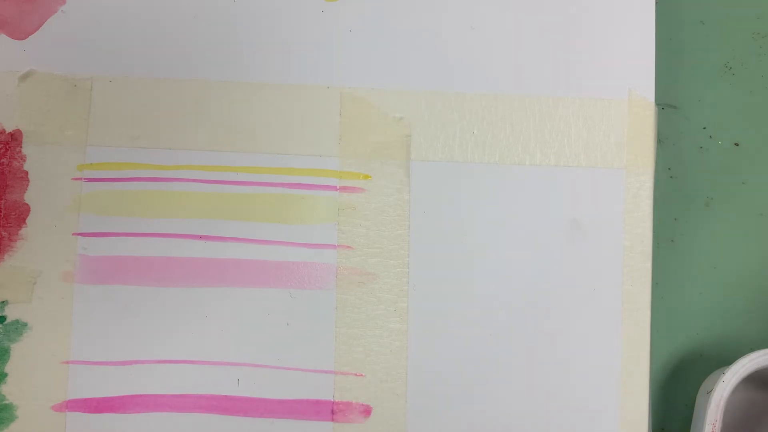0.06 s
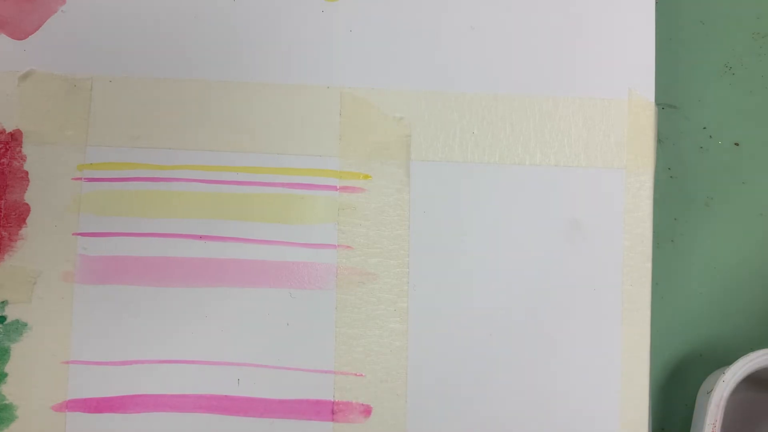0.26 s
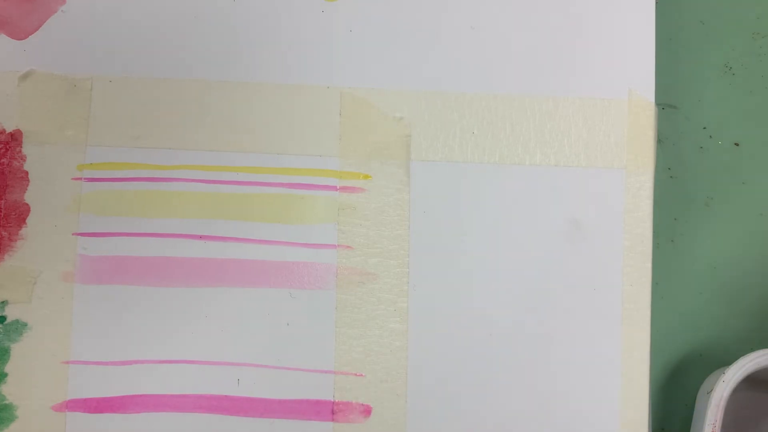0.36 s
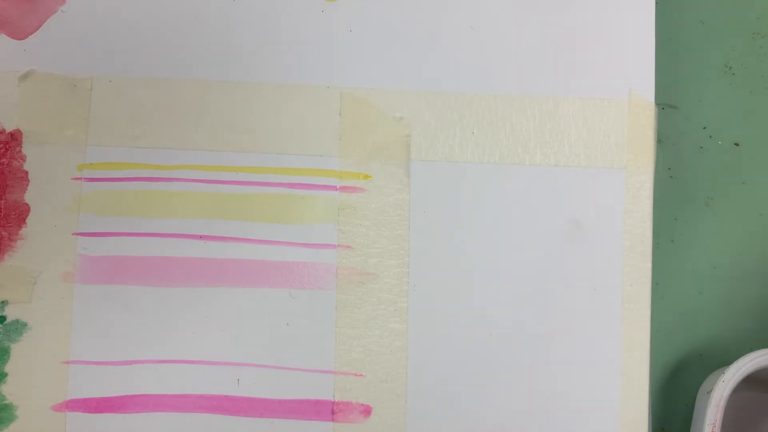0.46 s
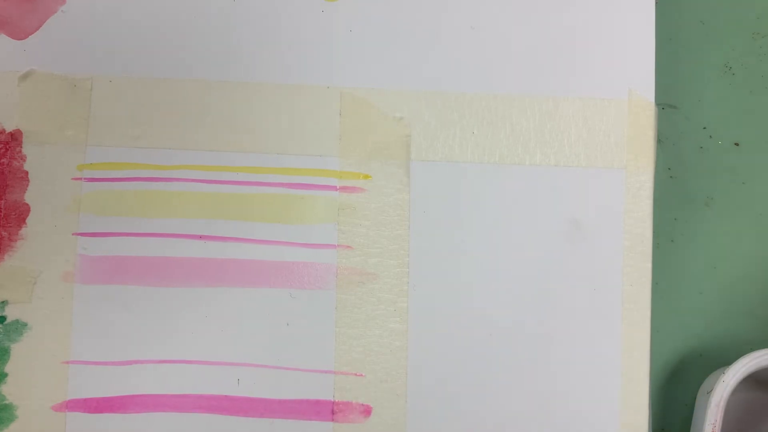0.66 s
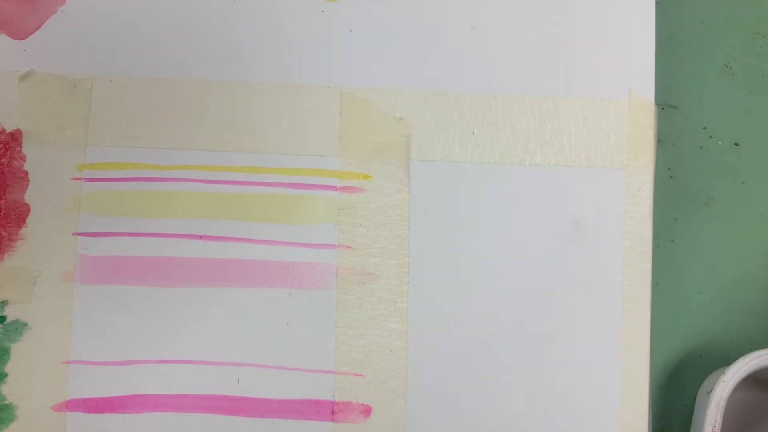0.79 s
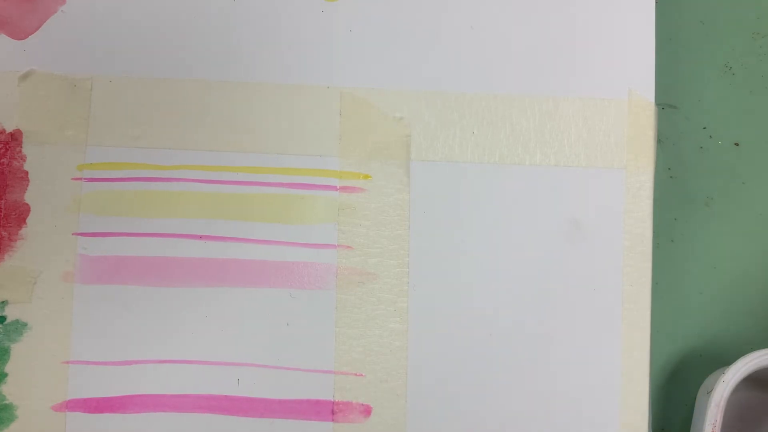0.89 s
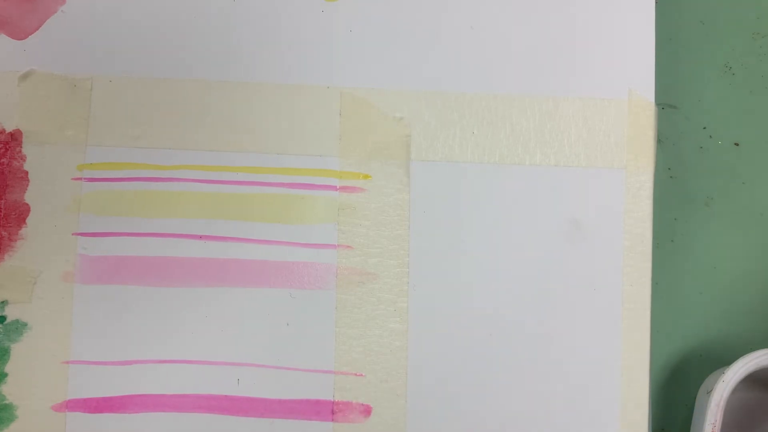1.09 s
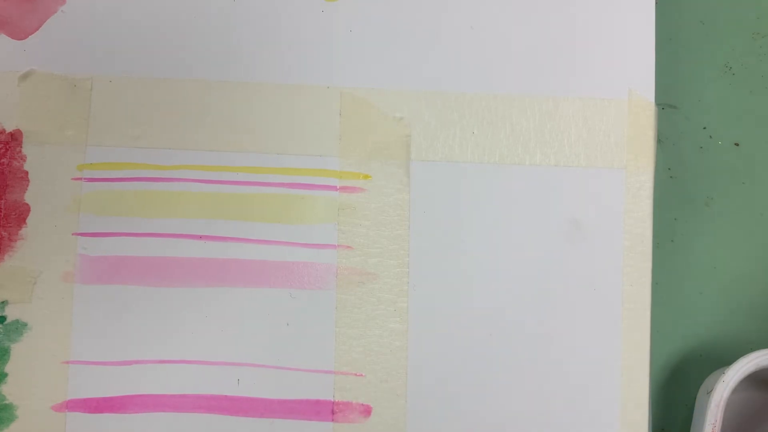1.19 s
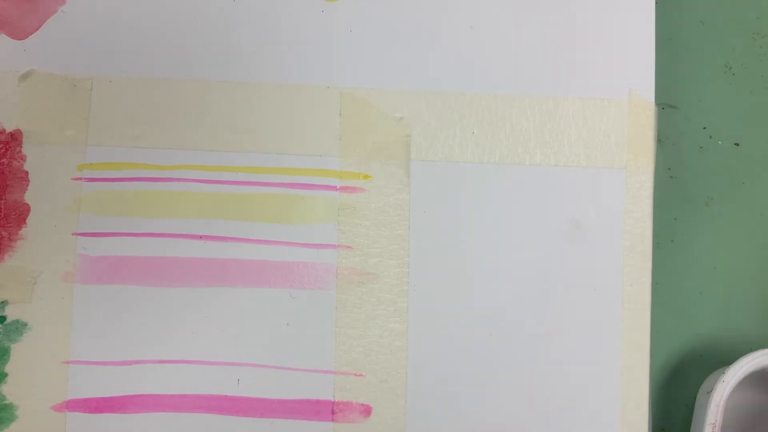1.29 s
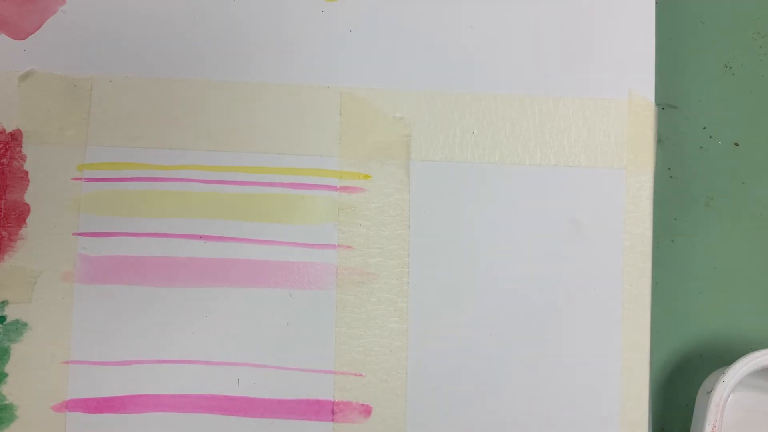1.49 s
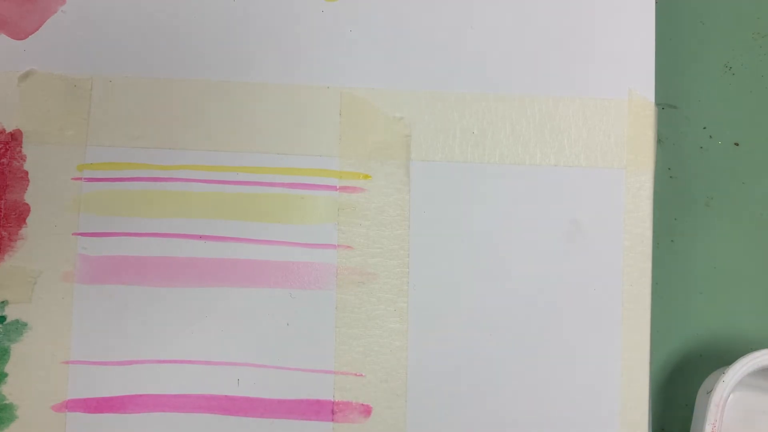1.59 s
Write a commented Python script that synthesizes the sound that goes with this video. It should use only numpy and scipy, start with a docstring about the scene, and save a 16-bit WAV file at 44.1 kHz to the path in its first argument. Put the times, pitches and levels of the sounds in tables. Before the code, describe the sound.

A paintbrush knocks rapidly and unevenly in a plastic cup of water, light taps first, then hard dry clacks mixed with ringing taps, faint glugs and swishing, ending on one bright tap; close stereo microphones, quiet room.

```python
"""A paintbrush rattles in a plastic cup of water, close by in a quiet room.
It strikes both walls in an uneven order: hard damped clacks on one, lighter taps on the other that ring on.
Each blow is a burst of noise plus fading tones; a tap also scrapes along the wall.
The water gives a few low glugs and one bright plip, made of gliding tones, and hisses as it is stirred.
The table top adds quick reflections; the room adds a short tail and a low rumble."""
import sys
import numpy as np
from scipy import signal
from scipy.fft import rfft, irfft
from scipy.io import wavfile

SR = 44100
rng = np.random.default_rng(int(sys.argv[2]) if len(sys.argv) > 2 else 0)


def log_audio(samples):
    """Write samples as a 16-bit WAV file to the path given in sys.argv[1]."""
    # one column per channel
    frames = np.atleast_2d(samples).T
    # limit to full scale, then quantise
    limited = np.clip(frames, -1, 1)
    pcm = np.round(limited * 32767).astype(np.int16)
    wavfile.write(sys.argv[1], SR, pcm)


N = 72765  # length in samples


def amp(db):
    """Turns decibels into a gain."""
    return 10 ** (np.asarray(db) / 20)


def read(points, hz):
    """Reads a table of (f/Hz, value) between its points, on a log-frequency axis."""
    f, value = np.transpose(points)
    return np.interp(np.log(hz + 1), np.log(f + 1), value)


def level_over_time(points):
    """Turns a table of (t/s, level/dB) into a gain for every sample."""
    return amp(np.interp(np.arange(N) / SR, *np.transpose(points)))


def unit(x):
    """Scales a sound to energy one."""
    return x / np.sqrt(np.sum(x ** 2) + 1e-20)


def add(mix, s, sound):
    """Mixes a sound in, starting at s seconds."""
    part = mix[max(round(s * SR), 0):][:len(sound)]
    part += sound[:len(part)]


def bins():
    """Frequencies in Hz of a spectrum padded to twice the length."""
    return np.fft.rfftfreq(2 * N, 1 / SR)


def coloured(x, db, size=4096):
    """Filters x with a gain in dB that depends on frequency, never sounding ahead of its input."""
    log_gain = np.log(amp(db(abs(np.fft.fftfreq(size, 1 / SR)))))
    minimum_phase = np.exp(np.conj(signal.hilbert(log_gain)))
    taps = np.fft.ifft(minimum_phase).real
    return signal.fftconvolve(x, taps[:size // 2])[:len(x)]


def dying(t, t60):
    """Exponential fade that drops 60 dB in t60 seconds."""
    return np.exp(-np.log(1000) * t / t60)


def partly_alike(a, b, same):
    """Pairs a with a blend of a and b; same = 1 gives twins, 0 gives strangers."""
    same = np.clip(same, -1, 1)
    return np.array([a, same * a + np.sqrt(1 - same ** 2) * b])


def noise(spectrum, same):
    """Two channels of noise, overall rms one, with a given colour and left-right likeness."""
    a, b = rfft(rng.standard_normal((2, 2 * N)))
    x = irfft(partly_alike(a, b, same) * amp(read(spectrum, bins())))[:, :N]
    return x / x.std()


# colour of the room rumble (f/Hz, relative level/dB per Hz)
RUMBLE_COLOUR = [(15, -63), (25, -34.5), (38, -14.5), (50, 0.5), (72, -12.5), (108, 3), (165, -8),
                 (280, -9), (439, -17), (540, -23), (780, -16), (1050, -18), (1500, -25.5), (2100, -28.5),
                 (3000, -32.5), (4600, -42.5), (7500, -52.5), (10000, -50), (14000, -49), (17000, -69)]
# slow swell of the rumble (t/s, change of level/dB)
RUMBLE_SWELL = [(0, -0.5), (.3, 1), (.8, -1), (1.2, -0.5), (1.65, -0.5)]
# how alike left and right are, in the rumble and in the room tail (f/Hz, likeness 0 to 1)
LIKENESS = [(60, 1), (130, 0.94), (290, 0.9), (640, 0), (1400, 0.4), (6000, 0.014)]
RUMBLE_DB = -53


def rumble():
    """Low room rumble: steady noise, nearly the same in both channels in the bass."""
    return noise(RUMBLE_COLOUR, read(LIKENESS, bins())) * amp(RUMBLE_DB) * level_over_time(RUMBLE_SWELL)


# colour of the stirred water's hiss (f/Hz, relative level/dB per Hz)
SWISH_COLOUR = [(200, -40), (500, -24), (1000, 7), (1800, 3), (3000, 3), (6000, -3.5), (9000, -24.5),
                (13000, -14), (16000, -28.5)]
# loudness of that hiss (t/s, level/dB)
SWISH_LEVEL = [(0, -92), (.25, -65), (.6, -65.5), (.8, -75.5), (1.0, -61.5), (1.2, -65.5), (1.45, -78),
               (1.65, -101)]


def swish():
    """The hiss of the swirling water: noise that comes and goes."""
    return noise(SWISH_COLOUR, 0) * level_over_time(SWISH_LEVEL)


# colour of the water parting round the bristles (f/Hz, relative level/dB per Hz)
STIR_COLOUR = [(600, -23), (1100, -12), (1550, 1.5), (1950, 2), (2500, -14), (5000, -34.5)]
# loudness of the parting water (t/s, level/dB)
STIR_LEVEL = [(0, -70), (.15, -65), (.3, -63), (.45, -77.5), (1.65, -82)]


def stir():
    """The first strokes through the water: a narrower noise, strongest early on."""
    return noise(STIR_COLOUR, 0) * level_over_time(STIR_LEVEL)


# how long the room tail takes to fade by 60 dB (f/Hz, t60/s)
ROOM_T60 = [(100, 0.18), (400, 0.19), (2000, 0.11), (6000, 0.18), (13000, 0.12), (17000, 0.073)]


def room(x):
    """A short diffuse tail, each band dying at its own speed; its bass is alike in both channels."""
    hz, t, (a, b) = signal.stft(rng.standard_normal((2, SR // 2)), SR, nperseg=256)
    bands = partly_alike(a, b, read(LIKENESS, hz)[:, None])
    tail = signal.istft(bands * dying(t, read(ROOM_T60, hz)[:, None]), SR)[1]
    fade_in = np.minimum(np.arange(tail.shape[1]) / SR / 0.0013, 1)  # over 1.3 ms
    tail = tail * fade_in
    return signal.fftconvolve(x[None], tail / np.linalg.norm(tail[0]), axes=1)[:, :N]


TABLE_DB, TABLE_T60_S = -2.5, 0.015


def table(x):
    """Quick scattered reflections from the table top in the midrange, different at each microphone."""
    t = np.arange(SR // 50) / SR
    taps = np.array([unit(row * dying(t, TABLE_T60_S)) for row in rng.standard_normal((2, len(t)))])
    midrange = signal.butter(2, [500, 5500], "bandpass", fs=SR, output="sos")
    mids = signal.sosfilt(midrange, x)
    return amp(TABLE_DB) * signal.fftconvolve(mids[None], taps, axes=1)[:, :N]


# air pockets in the water (t/s, starting f/Hz, level/dB, rise/s, t60/s, glide/octaves per s)
AIR_POCKETS = [(0.33, 1830, -34.5, 0.00056, 0.042, 5.5), (0.3366, 1870, -16, 0.0011, 0.013, 2.5),
               (0.339, 1743, -39, .002, 0.052, 2), (0.341, 322, -36, 0.002, 0.047, -3),
               (.374, 289, -34.5, 0.0026, 0.039, 0), (0.375, 116, -37, 0.0029, 0.078, 0),
               (0.9253, 260, -38.5, 0.0053, 0.055, -9), (0.9676, 520, -25, 0.0033, 0.031, 2),
               (.9690, 345, -24.5, .003, 0.045, 4.5), (.9700, 210, -19.5, 0.0052, 0.047, 1),
               (.978, 121, -27, 0.0073, 0.076, 2), (1.075, 117, -38, 0.012, 0.082, 1.5),
               (1.1235, 430, -41, 0.0018, 0.015, -3), (1.1240, 250, -19.5, 0.0055, 0.044, -8),
               (1.13, 150, -34.5, .006, .08, -1)]
SPLASH_DB, SPLASH_WIDTH_HZ = -11.5, 150  # level against the tone, half-width around its pitch


def water():
    """Each air pocket swells and dies as one gliding tone, with a little splash around its pitch."""
    out, t = np.zeros(N), np.arange(SR // 5) / SR
    f = np.fft.rfftfreq(len(t), 1 / SR)
    for s, hz, db, rise, t60, glide in AIR_POCKETS:
        gliding_hz = hz * 2 ** (glide * t)
        tone = np.sin(2 * np.pi * np.cumsum(gliding_hz) / SR)
        band = f / (f + hz) / (1 + ((f - hz) / SPLASH_WIDTH_HZ) ** 2)
        splash = irfft(rfft(rng.standard_normal(len(t))) * band, len(t))
        splash = unit(splash) * np.sqrt(len(t))  # rms one
        envelope = np.minimum(t / rise, 1) * dying(t, t60)
        add(out, s, amp(db) * envelope * (tone + amp(SPLASH_DB) * splash))
    return out


# colour of brush against plastic, for the scrape and the tick (f/Hz, level/dB)
CONTACT_COLOUR = [(100, -10.5), (450, -15), (1000, -11), (1700, -13.5), (2350, -27), (3100, -5.5),
                  (3800, -1.5), (4500, 2.5), (5600, -4), (6800, -0.5), (8300, -4), (11000, 1), (12600, 3.5),
                  (14300, 3.5), (15700, -2.5), (16800, -9)]
SCRAPE_DB, SCRAPE_T60_S, SCRAPE_PER_S = -8.5, 0.055, 2300  # level against the tick, fade, slips per second


def scrape(t):
    """The handle slides on along the wall in tiny uneven slips: random clicks that fade."""
    slips = (rng.random(len(t)) < SCRAPE_PER_S / SR) * rng.standard_normal(len(t))
    fading = unit(slips * dying(t, SCRAPE_T60_S))
    return amp(SCRAPE_DB) * coloured(fading, lambda hz: read(CONTACT_COLOUR, hz))


SNAP_DB, SNAP_T60_S = 11, 0.001  # noise of the snap against its single click
SHIVER_DB, SHIVER_T60_S = -1, 0.0085  # level against the snap
ALIKE = 0.53  # how much of the noise grain all blows share, 0 to 1


def octaves(hz):
    """Octaves from 7000 Hz, the middle of the cup's ring, limited to -2 and 1."""
    return np.clip(np.log2((hz + 1) / 7000), -2, 1)


def tick(t, shell, tilt_db):
    """The contact: a sharp snap, then the dense, quickly damped shiver of the plastic."""
    grain = ALIKE * shell + np.sqrt(1 - ALIKE ** 2) * rng.standard_normal(len(t))
    click = t == 0
    burst = unit(grain * dying(t, SNAP_T60_S) * (t > 0))
    snap = unit(click + amp(SNAP_DB) * burst)
    # the shiver comes up as the snap dies away
    shiver = unit(grain[::-1] * dying(t, SHIVER_T60_S) * (1 - dying(t, SNAP_T60_S)))
    contact = unit(snap + amp(SHIVER_DB) * shiver)
    return coloured(contact, lambda hz: read(CONTACT_COLOUR, hz) + tilt_db * octaves(hz))


# ringing tones (modes) of cup and brush (f/Hz, t60/s when free, level/dB in a clack, level/dB in a tap)
MODES = [(3183, 0.049, -59, -44.5), (4600, 0.067, -53, -42), (4856, 0.0096, -26, -42.5),
         (5250, 0.054, -51, -43.5), (5590, 0.088, -40.5, -77), (6380, 0.064, -33, -53.5),
         (6430, 0.11, -72, -32), (7240, 0.09, -36.5, -66), (7590, 0.085, -67.5, -41.5),
         (7424, 0.084, -53.5, -36), (7390, 0.075, -71.5, -39), (10110, 0.05, -28, -32.5),
         (11560, 0.024, -54, -65), (13200, 0.027, -37.5, -59), (14500, .035, -42.5, -64.5)]
# where the low, middle and high ring levels of a tap apply (f/Hz)
RING_GROUPS = [5000, 6425, 7400]
MODE_SPREAD_DB, MODE_DETUNE = 0, 0.0025  # random spread of level (0 = none) and of pitch, as a share
RING_ROUGH, RING_FLUTTER_HZ = 0.57, 160  # depth and speed of the flutter from the sliding handle


def ring(t, column, group_db, decay_share):
    """Fading tones, weighted low to high by where the brush lands, fluttering and detuned at each blow."""
    modes = np.array(MODES)
    hz, t60, db = modes[:, :1], modes[:, 1:2], modes[:, 2:][:, column, None]
    level_draw, pitch_draw = rng.standard_normal((2, len(MODES), 1))
    level = amp(db + np.interp(hz, RING_GROUPS, group_db) + MODE_SPREAD_DB * level_draw)
    detuned_hz = hz * (1 + MODE_DETUNE * pitch_draw)
    slow = np.exp(-(np.fft.rfftfreq(len(t), 1 / SR) / RING_FLUTTER_HZ) ** 2)
    flutter = irfft(rfft(rng.standard_normal((2, len(MODES), len(t)))) * slow, len(t))
    swell, sway = RING_ROUGH * flutter / flutter.std()  # loudness and phase in radians
    tone = (1 + swell) * np.sin(2 * np.pi * detuned_hz * t + sway)
    return (level * dying(t, t60 * decay_share) * tone).sum(0)


# hard strokes on the near wall (t/s, level/dB, brightness/dB per octave)
CLACKS = [(0.336, -1.5, -0.5), (0.4261, -7, -1.5), (.5112, -0.5, 0.5), (0.6846, -0.5, -0.5),
          (0.7625, -13.5, 4), (0.8422, -2.5, 0), (1.0139, -1.5, 0), (1.1710, -2.5, -1), (1.2604, -11, 0.5)]
# lighter, ringing touches
# (t/s, tick level/dB, tick brightness/dB per octave, low, middle and high ring level/dB)
TAPS = [(0.0878, -19, -2, -12, -24, -9.5), (0.1025, -43, -14, -41, -28, -11.5),
        (0.1783, -27, 0.5, -60, -49, -45), (0.2357, -19.5, 6, -12.5, -25, -11),
        (.2424, -25, -1, -28, -38, -22), (0.3793, -28, -6, -16.5, -15.5, -7),
        (0.4128, -30, 3.5, -42, -28, -13), (0.424, -14.5, 0, -15, -15, -6.5),
        (0.484, -31, -8, -23, -29, -22.5), (0.4967, -40, -4, -19, -25, -32),
        (0.5841, -15, -1, -10.5, -21, -12.5), (0.6015, -29, 3.5, -39.5, -22, -21.5),
        (0.607, -31.5, -2, -14, -28, -31.5), (0.6366, -30, 5.5, -44, -43, -27),
        (0.9108, -15.5, 4.5, -22, -14, -12), (0.9218, -7, -2, 0, 0.5, -4),
        (.9856, -25.5, -12.5, -10.5, -15.5, -13.5), (1.0796, -17.5, 0, -16, -20, -15),
        (1.0882, -14, -1, -6.5, -6, -6), (1.1260, -32, -4.5, -23, -19.5, -24),
        (1.3703, -14.5, 11.5, -29.5, -8.5, 1.5)]
PRESSED_DECAY = 0.5  # share of the ring time left while the brush presses on the wall


def brush():
    """The brush strikes both walls in an uneven order: hard damped clacks, and taps that ring freely."""
    out, t = np.zeros(N), np.arange(SR // 5) / SR
    shell = rng.standard_normal(len(t))  # noise grain common to all blows
    for s, db, tilt_db in CLACKS:
        clack = tick(t, shell, tilt_db) + ring(t, 0, np.zeros(len(RING_GROUPS)), PRESSED_DECAY)
        add(out, s, amp(db) * clack)
    for s, tick_db, tilt_db, *group_db in TAPS:
        touch = amp(tick_db) * (tick(t, shell, tilt_db) + scrape(t))
        add(out, s, touch + ring(t, 1, group_db, 1))
    return out


RIGHT_LEAD_S = 0.00039  # the direct sound reaches the right microphone this much sooner
CUP_ROOM_DB, WATER_ROOM_DB = -16, -8  # how much of each goes into the room tail


def scene():
    """The cup stands to the right of the microphones, so its sound arrives there first."""
    cup, glugs = brush(), water()
    direct = cup + glugs
    pair = np.array([direct, np.roll(direct, -round(RIGHT_LEAD_S * SR))])
    reflections = table(cup)
    tail = room(amp(CUP_ROOM_DB) * cup + amp(WATER_ROOM_DB) * glugs)
    background = rumble() + swish() + stir()
    return pair + reflections + tail + background


# balance of the microphones (f/Hz, left minus right level/dB)
BALANCE = [(60, -2.5), (120, -3.5), (280, 1.5), (550, -4), (1300, -2), (2600, -1.5), (4500, 0), (8000, 0)]
TREBLE_SPLIT_HZ, TREBLE_SHARE, TREBLE_LAG_S = 5600, 0.88, 0.000152
LOW_CUT_HZ, EDGE_HZ = 51, 16900  # bottom and top of the band


def record(dry):
    """The right treble is mostly the left's, slightly later; then balance, low cut and band limit."""
    hz, (left, right) = bins(), rfft(dry, 2 * N)
    # goes from 0 to 1 over 1000 Hz around the split
    above_split = np.clip((hz - TREBLE_SPLIT_HZ) / 1000 + 0.5, 0, 1)
    turn = TREBLE_SHARE * np.pi / 2 * above_split
    late_left = left * np.exp(-2j * np.pi * hz * TREBLE_LAG_S)
    right = np.cos(turn) * right + np.sin(turn) * late_left
    lean = amp(read(BALANCE, hz) / 2)
    low_cut = hz ** 2 / np.hypot(hz ** 2, LOW_CUT_HZ ** 2)
    out = irfft(low_cut * np.array([left * lean, right / lean]))[:, :N]
    band_limit = signal.firwin(511, EDGE_HZ, window=("kaiser", 9), fs=SR)
    return signal.oaconvolve(out, band_limit[None], "same")


dry = scene()
out = record(dry)
log_audio(out)
```